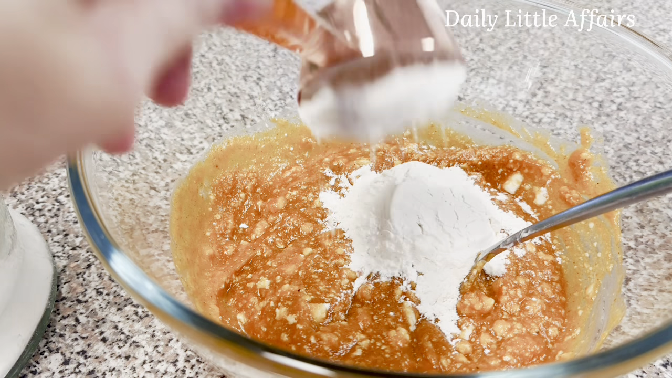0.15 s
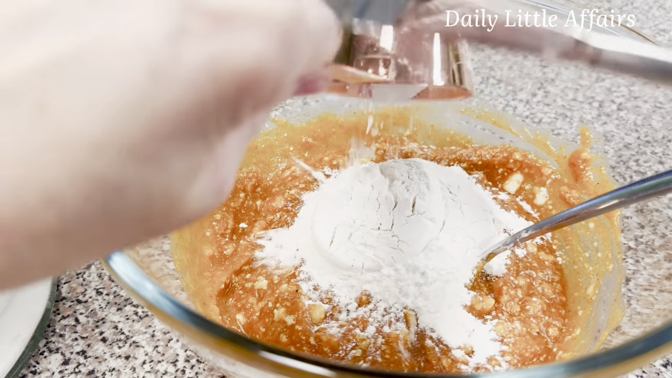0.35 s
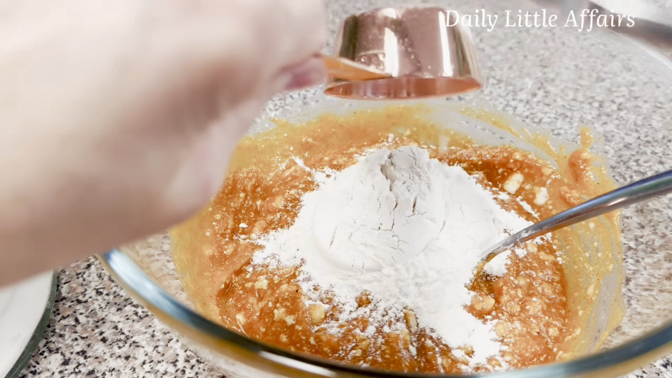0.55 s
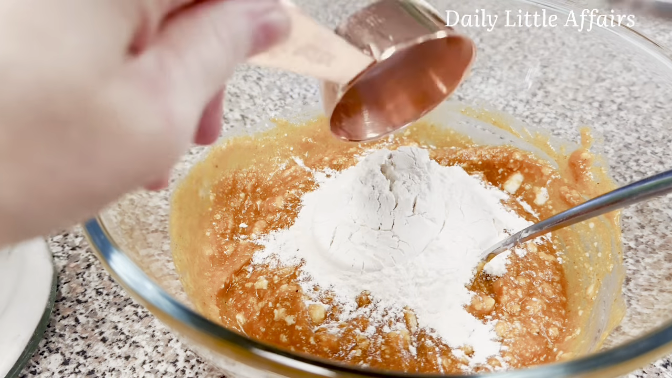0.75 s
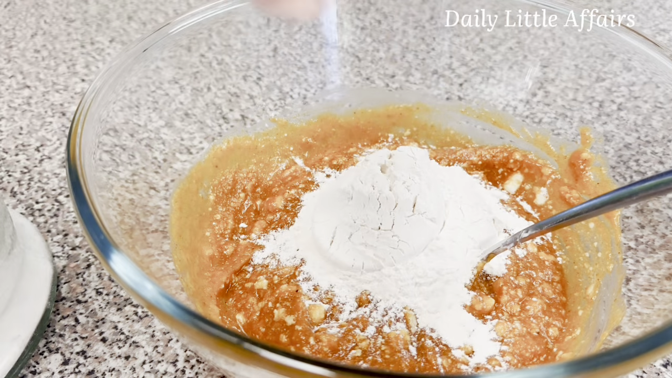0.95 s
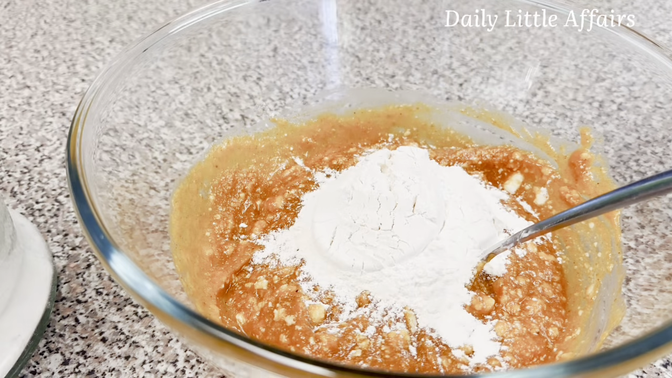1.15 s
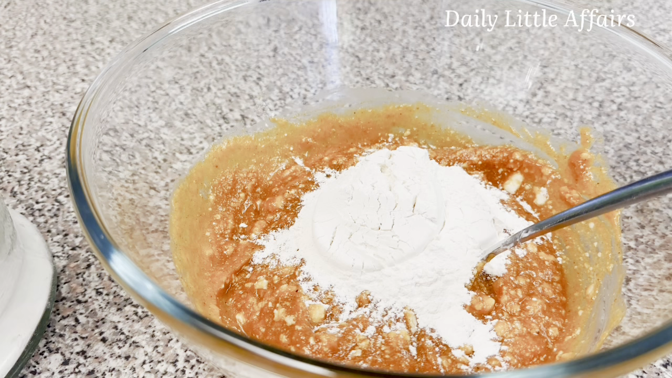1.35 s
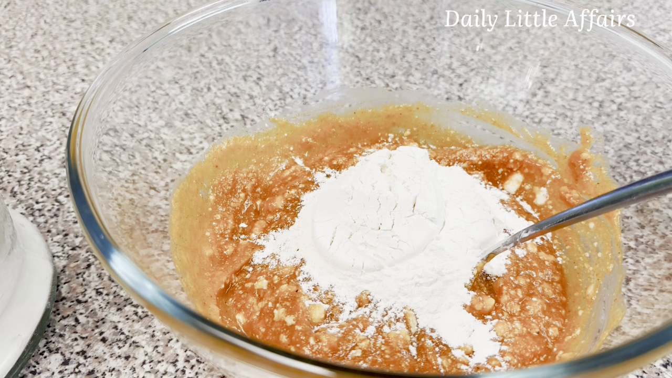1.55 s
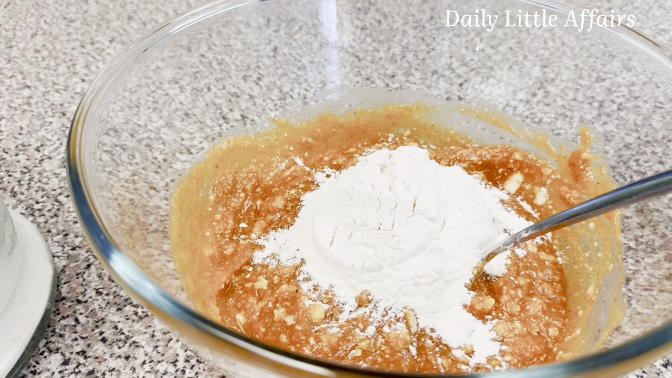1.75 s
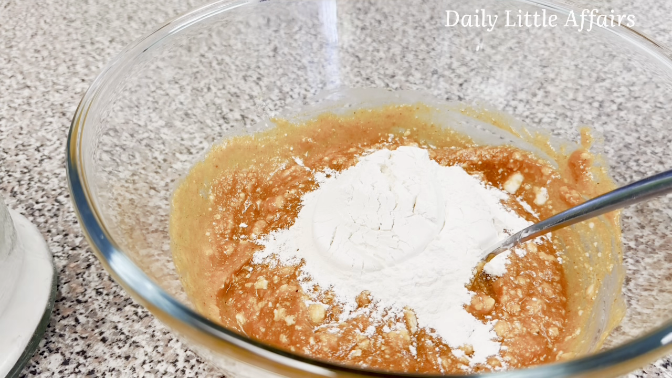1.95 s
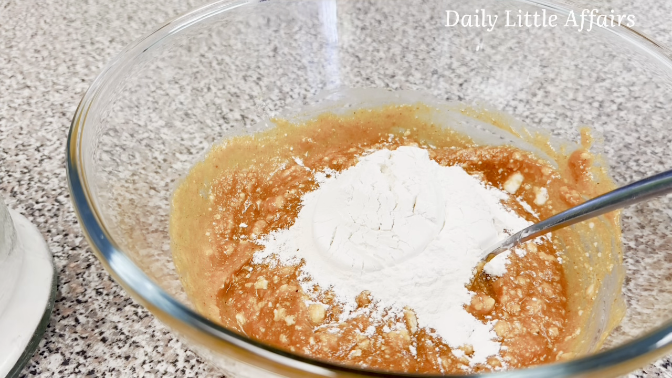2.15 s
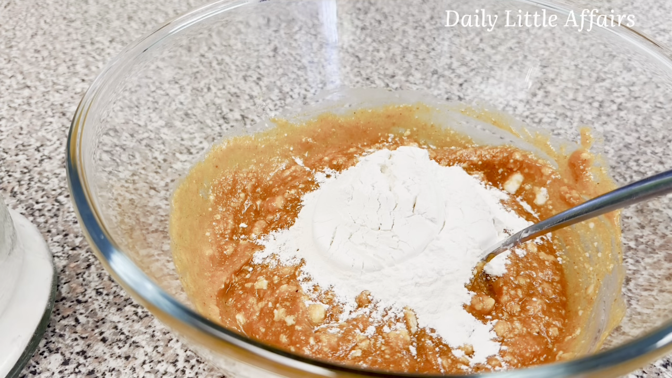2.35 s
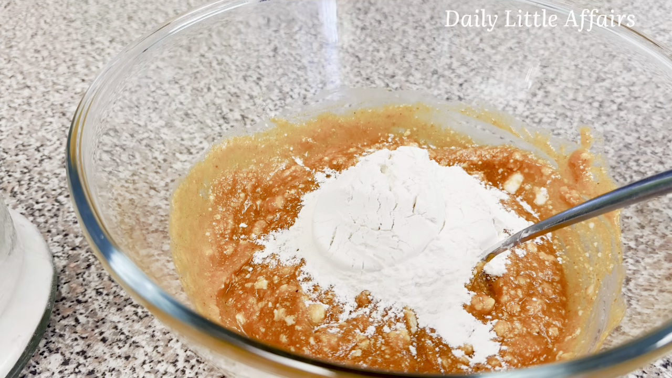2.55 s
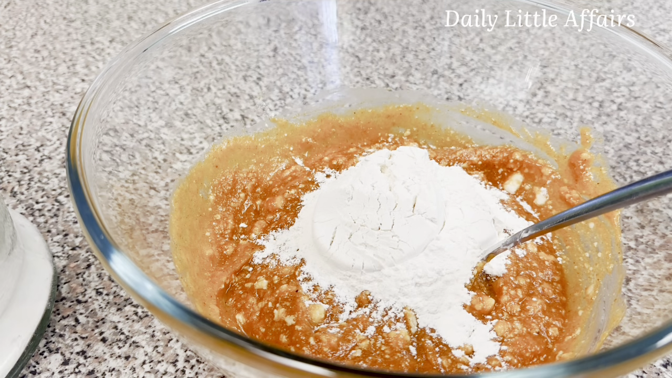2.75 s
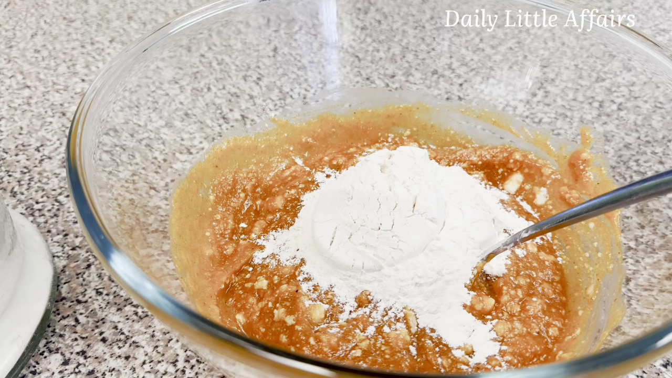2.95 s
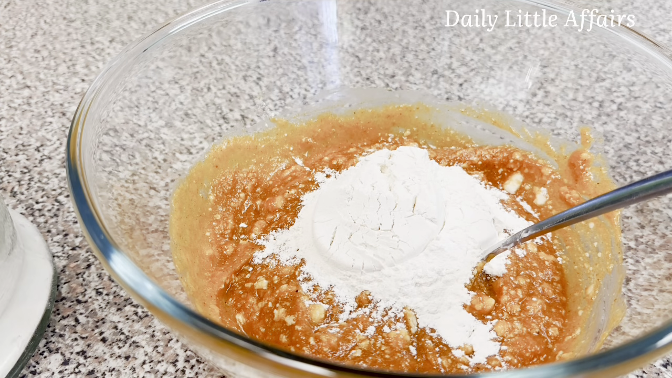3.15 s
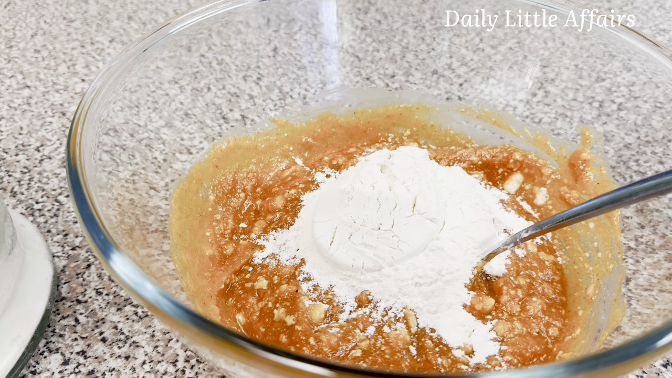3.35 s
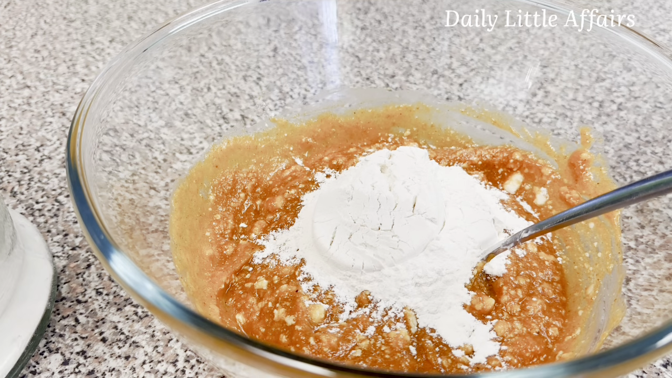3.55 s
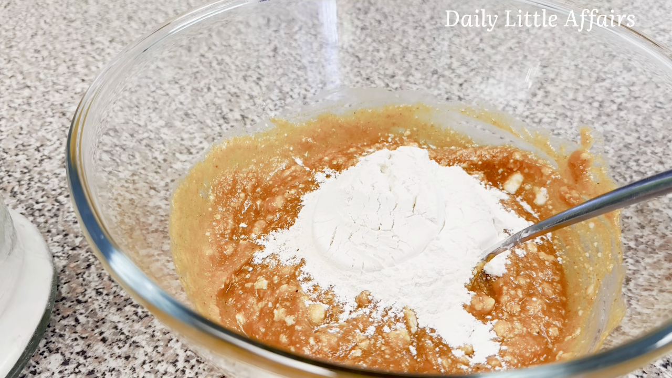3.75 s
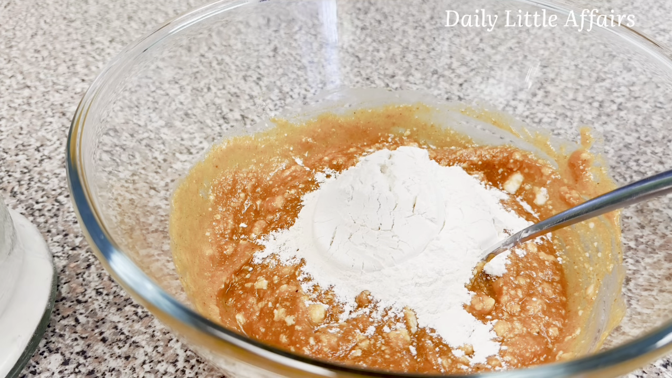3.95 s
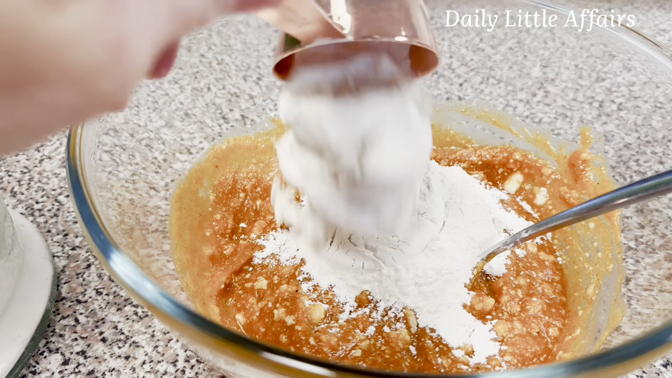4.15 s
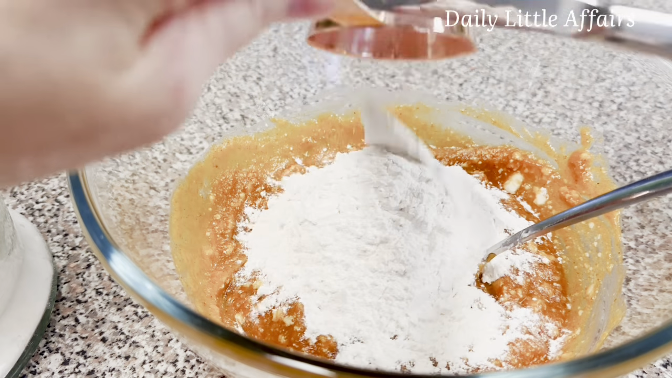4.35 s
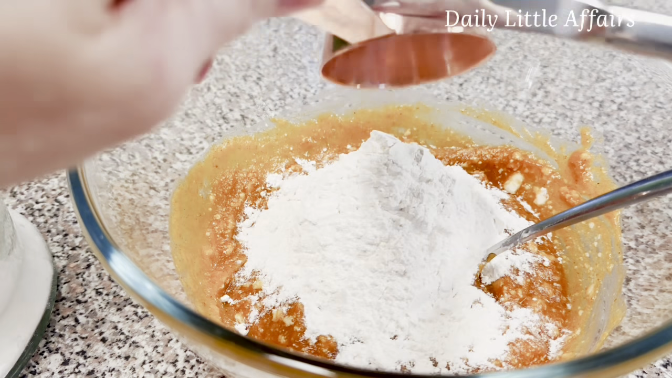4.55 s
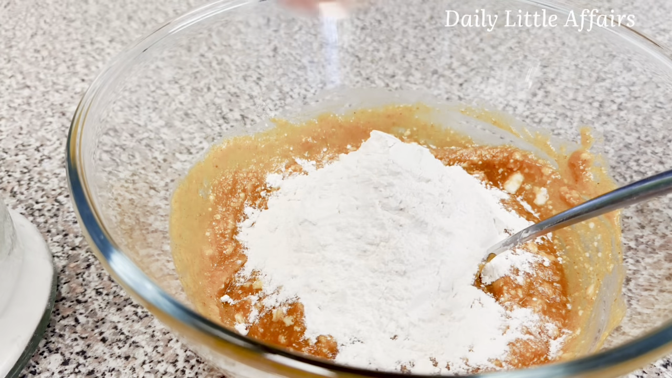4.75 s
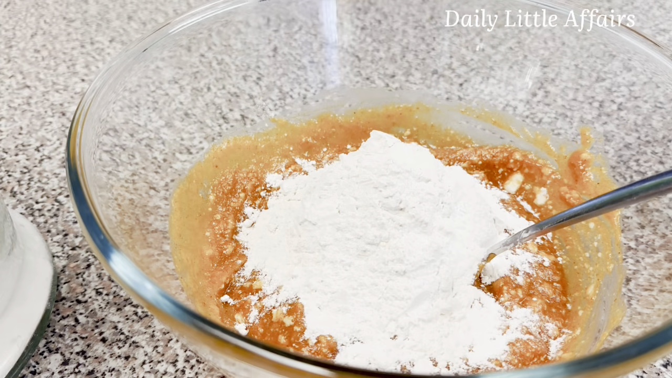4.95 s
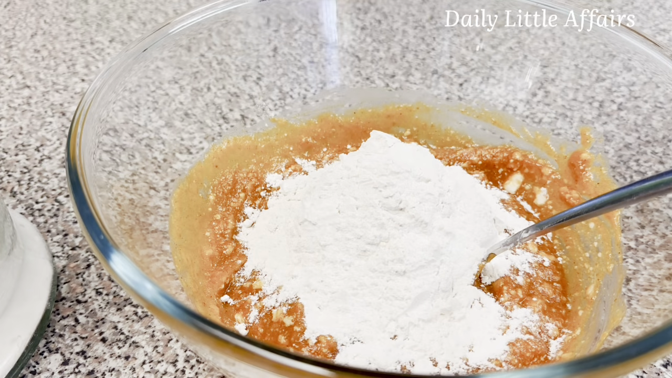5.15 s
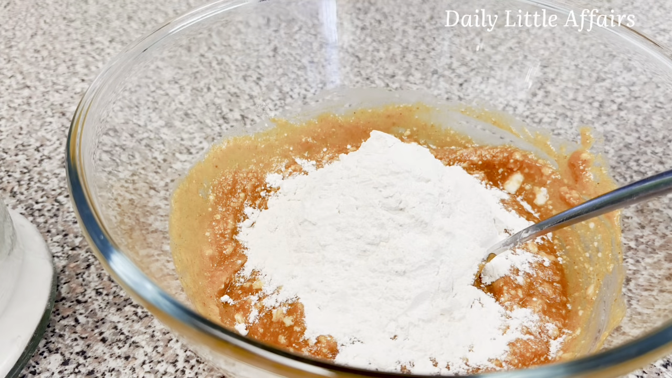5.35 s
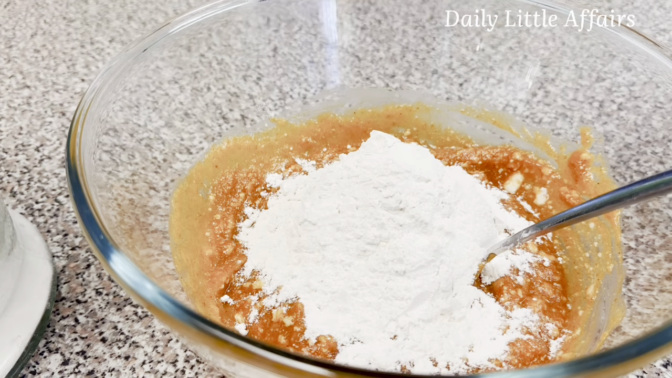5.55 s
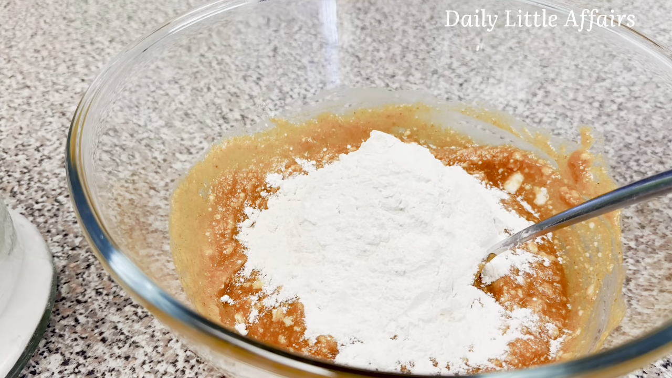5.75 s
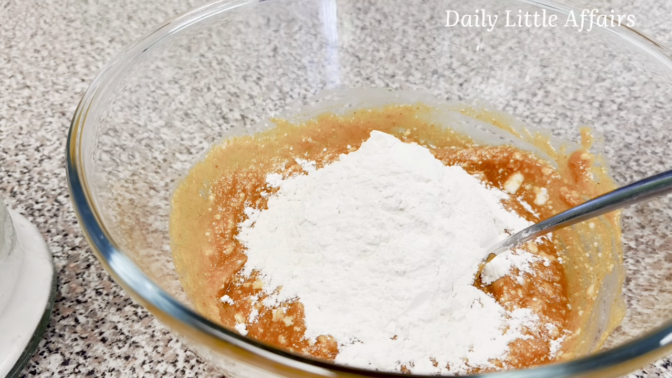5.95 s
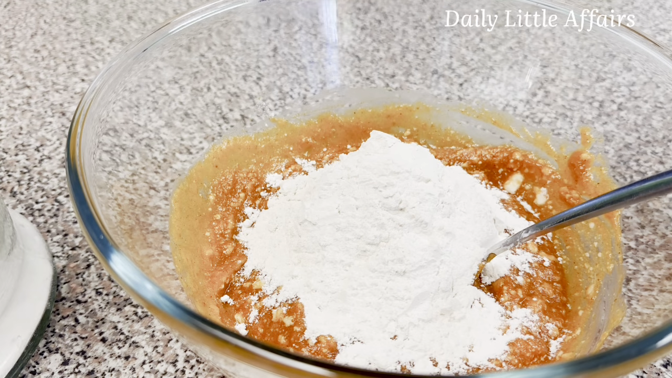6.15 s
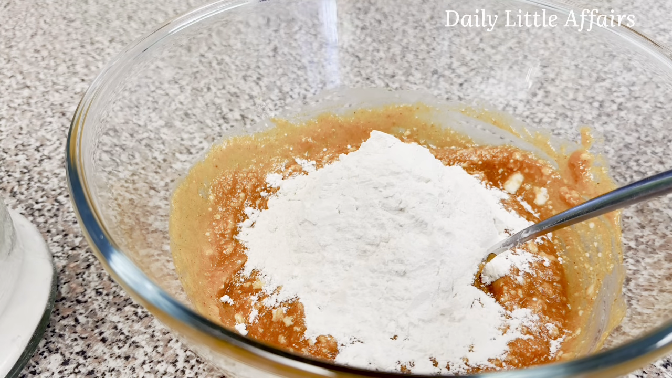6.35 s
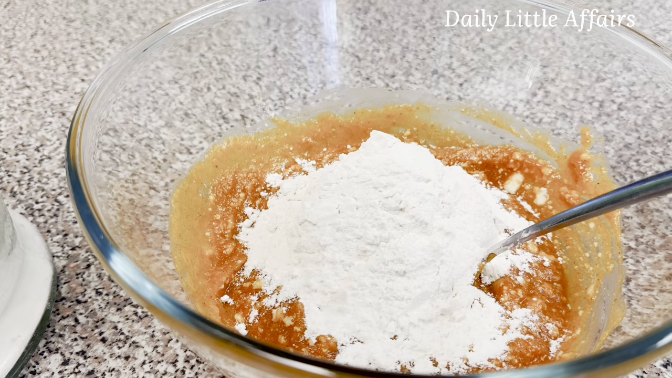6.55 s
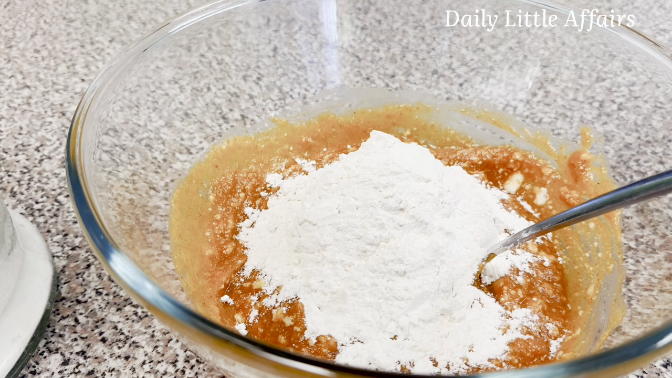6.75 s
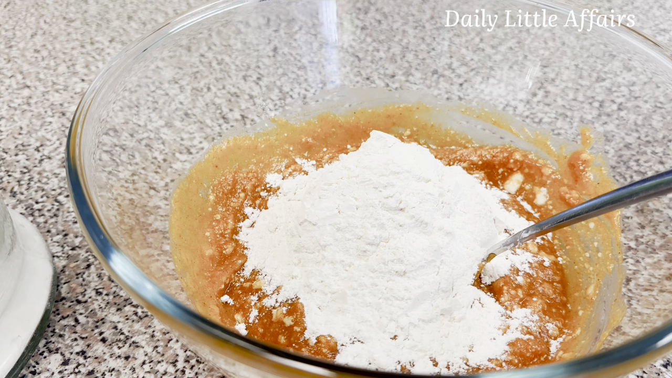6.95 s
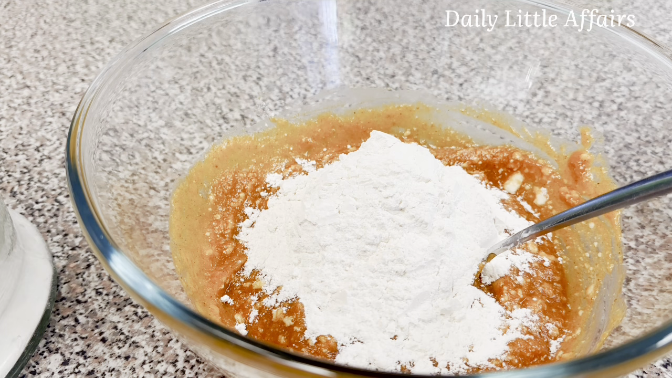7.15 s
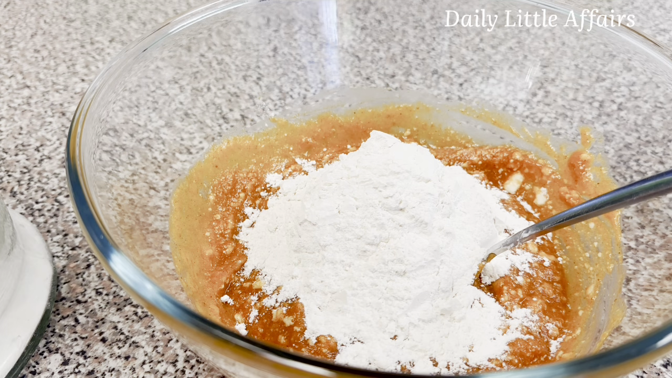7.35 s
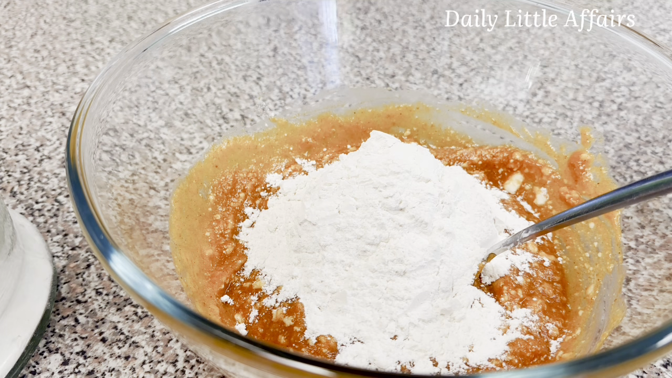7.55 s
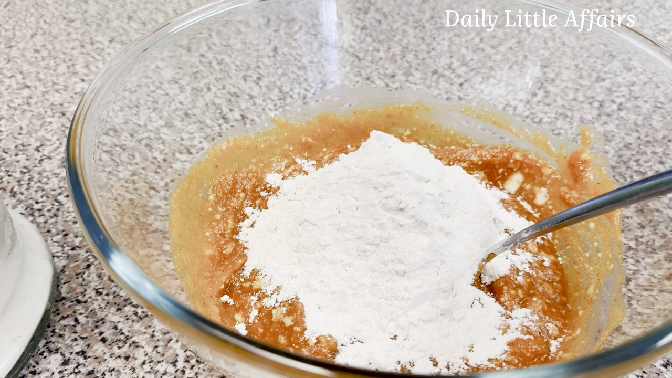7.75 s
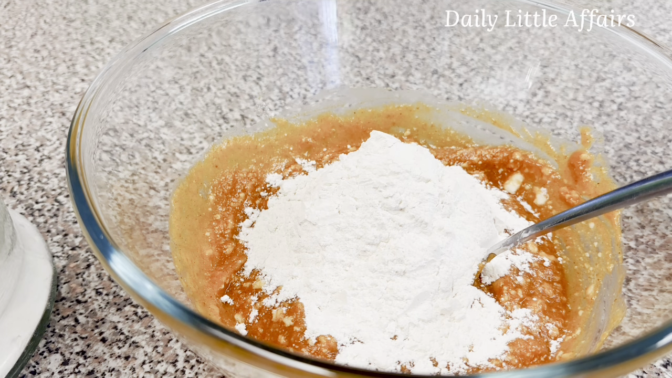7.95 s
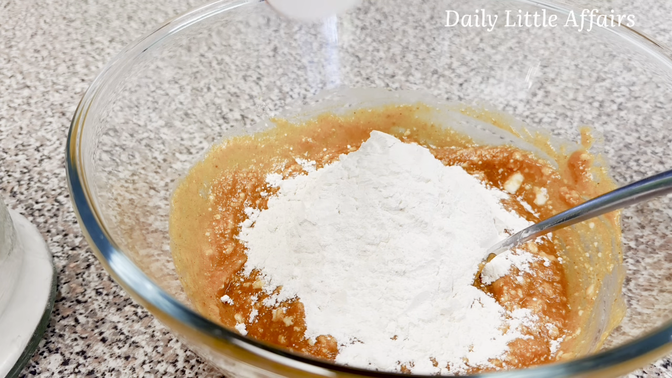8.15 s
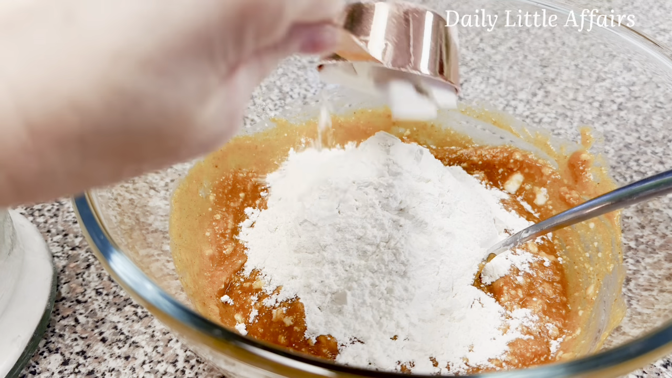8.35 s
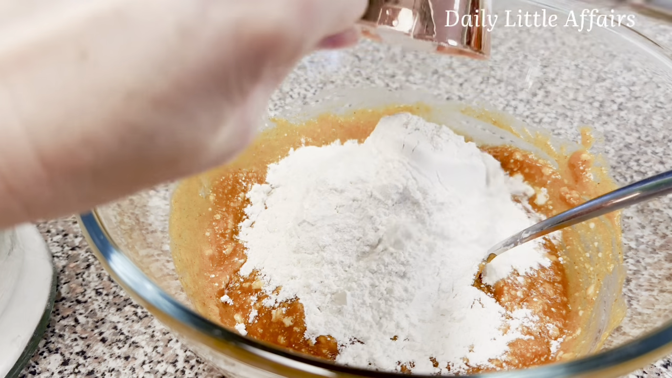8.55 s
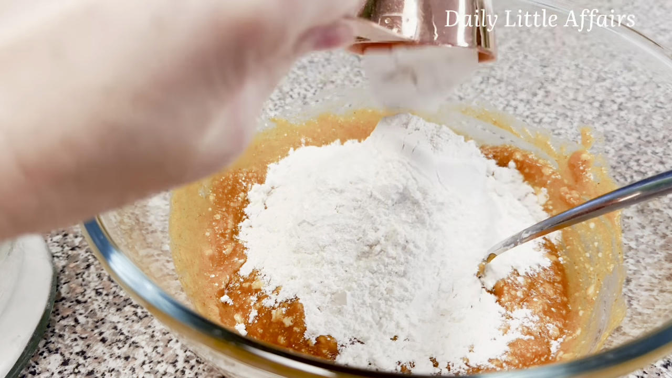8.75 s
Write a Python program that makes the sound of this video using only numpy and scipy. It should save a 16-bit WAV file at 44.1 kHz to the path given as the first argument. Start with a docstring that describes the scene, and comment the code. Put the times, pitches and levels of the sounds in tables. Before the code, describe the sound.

A knife taps flour out of a metal measuring cup into a bowl, with faint scooping and scraping in a quiet kitchen.

```python
"""Sharp knife taps on an upturned metal measuring cup, emptying its flour into a bowl: crack, rebound,
blade and rim ringing on. Between tap groups the cup digs into a flour jar; on the left the knife
knocks it and scrapes it level, stick-slip on the rim plus the hiss of sheared flour. Faint sleeve
rustle, ticks, a clink, counter bumps. Quiet, hard kitchen with fridge hum; two spaced microphones."""
import sys
import numpy as np
from scipy import signal
from scipy.fft import rfft, irfft
from scipy.io import wavfile
from scipy.ndimage import uniform_filter1d

SR = 44100
rng = np.random.default_rng(int(sys.argv[2]) if len(sys.argv) > 2 else 0)


def output_pcm(signal):
    """Save a mono or channel-first signal as 16-bit PCM at the path in sys.argv[1].

    Samples are clipped to [-1, 1] before scaling.
    """
    pcm = np.clip(np.atleast_2d(signal).T, -1, 1) * 32767
    wavfile.write(sys.argv[1], SR, np.round(pcm).astype(np.int16))


N = 388080

# knife on cup: t/s, blow/dB, clinging flour/dB, rim/dB, tilt/(dB/oct), free ring/dB, bending/dB,
# rebound delay/s, rebound/dB
KNIFE_TAPS = [(0.3318, -18.5, 10.5, 5.5, -0.5, -63.5, -10, 0.029, -29),
              (0.5016, -11.5, 1.5, 0, -0.7, -30, -13, 0.016, -8.5),
              (0.692, -13, -8, 6, 1, -28, -7, 0.015, 0.5),
              (4.2137, -15, 2.5, -0.5, -1, -61, 4, 0.017, -17.5),
              (4.3811, -20, 1.5, 1, 2.5, -54, 9, .012, 1),
              (4.5788, -21, 1.5, 2, 2.2, -50.5, 13.5, 0.013, 1.5),
              (8.645, -17, 8.5, -16, 5, -70, -5, 0.017, -6.5)]
# centres of the flour-laden, bottom, rim, wall and edge modes: f/Hz
CUP_REGIONS_HZ = [700, 1600, 3600, 7000, 13000]
# modes: f/Hz, level/dB, nominal t60/s, left-right/dB
EMPTY_CUP_MODES = [(447, -12.5, 0.024, 0.5), (626, -10.5, 0.025, 2), (715.2, -3, 0.027, 0),
                   (1553, -11, 0.04, 1.5), (1762, -6.5, 0.068, 3.5), (2281, -14.5, 0.12, 0.5),
                   (3618, -3, 0.084, 2), (5500, -2.5, 0.012, 7), (6840, 8, 0.0055, -1.5),
                   (8850, -10, 0.04, -8.5), (12955, -7.5, 0.057, 0.5), (14000, 0, 0.0056, -2.5)]
FREE_METAL_MODES = [(1006, 0, .42, 0), (2438, -5, 1., -4), (3661, 1, .5, 0), (4327, -1, .45, -2),
                    (5098, -11, .35, -3)]  # blade and cup rim ringing on after the rebound
JAR_MODES = [(108, -10, 0.097, -1.5), (193.3, -9.5, .08, 3), (277, -14, 0.1, 4.5), (351, 0.5, 0.045, -1.5),
             (1016, -9.5, 0.04, -3.5), (1720, -23, 0.034, 8), (2230, 0.5, 0.02, -9.5), (2892, -7, .03, 4.5),
             ]  # jar and shelf
FULL_CUP_MODES = [(192, 1.5, 0.086, 0), (328.3, 11, 0.049, 1.5), (971, -3.5, 0.049, 14.5),
                  (1063, -1.5, 0.033, -0.5), (2127, -3, 0.066, 7), (2953, 1.5, 0.034, 9.5),
                  (4425, -14.5, 0.073, 24), (5097, 2, 0.037, 8), (5960, -3, 0.049, 12.5),
                  (6470, -4.5, 0.081, 10.5), (13300, -19, 0.048, -14)]  # first two rows: thud
CLINK_MODES = [(3205, -4.5, 0.14, 0.005), (4323, -7, 0.079, 0)]
# bending per free metal mode: weight/1
BENDING_WEIGHTS = [1.3, -0.19, 1.5, .8, -0.75]
# contacts: t/s, level/dB
JAR_STRIKES = [(1.68, -11.5)]
RIM_SNAGS = [(2.784, -55), (3.288, -31.5), (3.335, -39), (3.355, -32), (3.385, -39.5), (7.268, -40),
             (7.306, -49), (7.389, -43), (7.478, -41), (7.579, -63)]
METAL_CLINKS = [(8.513, -56.5)]
# knife on heaped cup: t/s, thud/dB, ring/dB
CUP_KNOCKS = [(2.677, -43, -40.5), (3.185, -37, -36), (3.207, -34, -36.5), (5.307, -44.5, -63),
              (6.6, -50, -65), (6.662, -62, -62.5), (7.133, -34.5, -47), (7.24, -45.5, -50),
              (7.692, -42, -68.5), (7.727, -46, -70)]
# blade over rim: start/s, release/s, level/dB
RIM_SCRAPES = [(2.73, 2.79, -52.5), (3.22, 3.47, -42), (7.24, 7.59, -46)]
# hand and sleeve: t/s, length/s, level/dB
SLEEVE_MOVES = [(1.95, 0.38, -74), (4.013, 0.038, -76), (5.278, 0.07, -73.5), (5.437, 0.061, -72.5),
                (6.196, 0.049, -75.5), (6.633, 0.049, -69.5)]
# small impacts: t/s, level/dB, f/Hz
DRY_TICKS = [(0.043, -49, 4530), (0.276, -37, 2220), (2.516, -62, 3010), (2.547, -65.5, 3010),
             (3.056, -40, 12000), (4.028, -53.5, 5520), (5.9376, -40.5, 13330), (8.487, -52, 7440)]
COUNTER_BUMPS = [(1.079, -46, 75), (1.72, -36, 65.3), (5.312, -38, 77.4), (5.652, -42, 75)]
# noise spectra: f/Hz, relative density/dB
FLOUR_SPECTRUM = [(290, -47), (500, -29), (855, -8), (1230, -12.5), (2980, -10.5), (5090, -15.5),
                  (12900, -28.5), (16000, -74)]
CLOTH_SPECTRUM = [(880, -42), (1500, -10), (4160, -19.5), (5330, -9), (7170, -26), (13300, -40),
                  (16000, -37)]
RUMBLE_SPECTRUM = [(24, -38), (40, -11), (167, -3), (382, -4.5), (630, -16.5), (751, -12), (1950, -34),
                   (6020, -48), (11300, -58), (14500, -54.5), (16000, -63)]
# rumble between microphones: f/Hz, correlation/1
RUMBLE_COHERENCE = [(60, 1), (380, 0.27), (2380, -0.32), (15000, -0.082)]
# fridge tones: f/Hz, rms level/dB
FRIDGE_TONES = [(59.2, -65), (96.9, -69.5), (193.8, -61.5), (393.0, -66)]
# room decay: f/Hz, t60/s
ROOM_T60 = [(200, 0.98), (530, 0.3), (1390, 0.71), (3680, 0.61), (9700, 0.49)]
# microphone pair, mid and side response: f/Hz, gain/dB
MID_RESPONSE = [(9800, 0.5), (10600, -8), (12000, -13), (12600, -2.5)]
SIDE_RESPONSE = [(12000, 1.5), (12800, -7)]

CRACK_T60_S, CUSHION_DB_PER_DB = 0.00886, 0.71  # base decay; clinging flour lengthens it
REBOUND_DAMPING = 2.8  # a springing blade lingers and damps the cup
JOLT_DB, JOLT_DB_PER_DB = -12, 0.54  # more rebound, more jolt
GRIP_S = 0.99  # grip has stilled the ring by then
FLAT_RING_DB, TILT_PER_OCT = -34, 0.32  # harder knocks are brighter
SLIPS_PER_S, SMOOTH_HISS_GAIN = 1500, 1.3
PRESS_DAMPING, ROAM_SHARE = 1.6, 0.016  # pressing blade damps and detunes the cup
OVERLOAD_FS, BAND_LIMIT_HZ = 0.9, 16500


def knife_taps():
    """Crack, damped cup modes, counter jolt; blade and cup rim ring on after the rebound."""
    rings, cracks, close = np.zeros((3, 2, N))
    mode_hz = np.transpose(EMPTY_CUP_MODES)[0]
    grip = np.cos(np.pi / 2 * np.minimum(np.arange(SR) / SR / GRIP_S, 1) ** 4)
    for s, blow_db, flour_db, rim_db, tilt_db_oct, free_db, bend_db, delay_s, rebound_db in KNIFE_TAPS:
        region_db = blow_db + tilt_db_oct * np.log2(np.divide(CUP_REGIONS_HZ, CUP_REGIONS_HZ[2]))
        region_db[[0, 2]] = blow_db + flour_db, blow_db + rim_db
        colour = np.transpose([CUP_REGIONS_HZ, region_db])
        mode_db = at_hz(colour, mode_hz)
        crack_colour = [(400, region_db[1] - 9.5), *colour[[1, 3, 4]]]  # small cup: little bass
        damping = 1 + REBOUND_DAMPING * gain(rebound_db)
        add(rings, s, gain(-1) * ring(EMPTY_CUP_MODES, mode_db, damping))
        add(cracks, s, gain(10) * crack(crack_colour, CRACK_T60_S * gain(CUSHION_DB_PER_DB * flour_db)))
        skid = rng.standard_normal((1, 300)) * np.hanning(300) / 10
        rebound = signal.oaconvolve(ring(EMPTY_CUP_MODES, mode_db), skid, axes=1)
        add(rings, s + delay_s, gain(rebound_db - 4.5) * rebound)
        add(cracks, s + delay_s, gain(rebound_db - 2) * crack(crack_colour, t60_s=0.12))
        for mode, weight in zip(FREE_METAL_MODES, BENDING_WEIGHTS):
            turning_db = 3.5 * wander(1500, samples=SR)  # metal turns in the hand
            free_ring = ring([mode], bend_db * weight, samples=SR)
            add(close, s + delay_s, gain(free_db + turning_db) * grip * free_ring)
        jolt_db = blow_db + JOLT_DB + JOLT_DB_PER_DB * rebound_db
        add(close, s, gain(jolt_db) * bump(hz=75, t60_s=0.1))
    return delay_left(rings, samples=3) + delay_left(cracks, samples=6), close


def jar_plunge():
    """The digging cup strikes the jar; jar and shelf ring."""
    out = np.zeros((2, N))
    colour = [(300, 5.5), (2500, 9), (8000, -11.5), (16000, -30)]
    for s, blow_db in JAR_STRIKES:
        add(out, s, gain(blow_db) * (ring(JAR_MODES) + crack(colour, t60_s=0.035)))
    return delay_left(out, samples=13)


def cup_knocks():
    """Knife on the heaped cup: dull thud, metal ring, crack."""
    out, hz = np.zeros((2, N)), np.transpose(FULL_CUP_MODES)[0]
    for s, thud_db, ring_db in CUP_KNOCKS:
        tilt_db_oct = TILT_PER_OCT * (ring_db - FLAT_RING_DB)
        mode_db = np.where(hz < 600, thud_db, ring_db + tilt_db_oct * np.log2(hz / 3000))
        add(out, s, ring(FULL_CUP_MODES, mode_db))
        colour = [(500, -6.5), (2800, 6.5), (16000, 5.1 * tilt_db_oct + 6.5)]
        add(out, s, gain(ring_db) * gain([[11.5], [4.5]]) * crack(colour, t60_s=0.066))
    return delay_left(out, samples=-15)


def rim_scrape():
    """Uneven slips and snags ring the full cup; sheared flour hisses."""
    slip_db = 6.5 * np.minimum(rng.exponential(1, N), 3)
    slips = gain(slip_db) * (rng.random(N) < SLIPS_PER_S / SR) * rng.choice([-1, 1], N)
    snag_rows = [(s, s, db) for s, db in RIM_SNAGS]
    snags = envelope(snag_rows, attack_s=0.002, ease_db_s=0, release_db_s=60 / 0.031)
    strokes = envelope(RIM_SCRAPES, attack_s=0.023, ease_db_s=35.5, release_db_s=320)
    push = strokes * gain(2.2 * wander(350)) + snags
    body = sum(rubbed_mode(unit_rms(slips) * push, *mode) for mode in FULL_CUP_MODES[2:])
    shear = slips + SMOOTH_HISS_GAIN * rng.standard_normal((2, N))
    hiss = coloured(shear, FLOUR_SPECTRUM) * gain([[-4.5], [-9]])
    return delay_left(gain(-29.5) * body + hiss * push, samples=-15)


def rubbed_mode(force, hz, db, t60_s, side_db):
    """Driven mode; pitch and strength roam with the contact point."""
    phasor = np.exp(2j * np.pi * np.cumsum(hz * (1 + ROAM_SHARE * wander(2500))) / SR)
    drive = force * gain(db + 3.5 * wander(2500)) / phasor + 1e-18
    pole = gain(-60 * PRESS_DAMPING / t60_s / SR)
    wave = (phasor * signal.lfilter([1], [1, -pole], drive)).real
    return wave * gain([[side_db / 2], [-side_db / 2]])


def sleeve_rustle():
    """Grainy cloth noise in short gestures."""
    grains = rng.standard_normal((2, N)) * gain(2 * flutter(150))
    moves = [(s, s + length_s, db) for s, length_s, db in SLEEVE_MOVES]
    motion = envelope(moves, attack_s=0.0062, ease_db_s=2.5, release_db_s=247.5)
    return coloured(grains, CLOTH_SPECTRUM) * motion


def ticks_and_clink():
    """Faint dry contacts and a light metal ring."""
    out = np.zeros((2, N))
    for s, db, hz in DRY_TICKS:
        add(out, s, gain(db) * crack([(hz / 4, -24), (hz, 0), (hz * 3, -34)], t60_s=0.02))
    for s, db in METAL_CLINKS:
        add(out, s, gain(db) * ring(CLINK_MODES))
    return out


def counter_bumps():
    """Soft thumps carried by the counter."""
    out = np.zeros((2, N))
    for s, db, hz in COUNTER_BUMPS:
        add(out, s, gain(db) * bump(hz, t60_s=0.3))
    return out


def kitchen_reverb(x, gap_s=0.006):
    """Sparse random-sign reflections; each band decays at its own rate."""
    echoes = np.zeros((2, SR))
    arrivals = np.arange(0, SR - 20, 20) + rng.integers(0, 20, (2, (SR - 1) // 20))
    np.put_along_axis(echoes, arrivals, rng.choice([-1., 1.], arrivals.shape), 1)
    hz, t, bands = signal.stft(echoes, SR, nperseg=256)
    decay_db = -60 * t / at_hz(ROOM_T60, hz)[:, None]
    colour_db = at_hz([(120, -13.5), (400, -0.5), (15000, -9)], hz)[:, None]
    tail = signal.istft(bands * gain(decay_db + colour_db), SR, nperseg=256)[1]
    tail = np.pad(tail / np.linalg.norm(tail[0]), ((0, 0), (round(gap_s * SR), 0)))
    return signal.fftconvolve(x, tail, axes=1)[:, :N]


def room_rumble(rms_db=-53.5):
    """Low noise in drifting patches, partly coherent between the microphones."""
    frames, hz = N // 512 + 5, np.fft.rfftfreq(2048, 1 / SR)
    left_re, left_im, other_re, other_im, patches = rng.standard_normal((frames, 1025, 5)).T
    patches = unit_rms(uniform_filter1d(uniform_filter1d(patches, 10, axis=0), 6, axis=1))
    coherence = np.clip(at_hz(RUMBLE_COHERENCE, hz), -1, 1)[:, None]
    left = left_re + 1j * left_im
    right = coherence * left + np.sqrt(1 - coherence ** 2) * (other_re + 1j * other_im)
    bands = np.array([left, right]) * gain(at_hz(RUMBLE_SPECTRUM, hz)[:, None] + 2.2 * patches)
    return gain(rms_db) * unit_rms(signal.istft(bands, nperseg=2048, noverlap=1536)[1][:, :N])


def fridge_hum():
    """Low tones wavering in phase and level."""
    out, t = np.zeros(N), np.arange(N) / SR
    for hz, db in FRIDGE_TONES:
        drift_rad, waver_db = 0.25 * flutter(4000), 0.38 * flutter(4000)
        out += np.sqrt(2) * gain(db + waver_db) * np.sin(2 * np.pi * hz * t + drift_rad)
    return out


def ring(modes, extra_db=0., damping=0.93, samples=SR // 4):
    """Struck modes: panned decaying sines, strengths scattered per blow."""
    hz, db, t60_s, side_db = np.transpose(modes)[:, :, None]
    t = np.arange(samples) / SR
    db = db + np.reshape(extra_db, (-1, 1)) + 1.5 * rng.standard_normal(db.shape)
    waves = gain(db - 60 * damping * t / t60_s) * np.sin(2 * np.pi * hz * t)
    waves *= 1 - np.exp(-t * hz * 1.7)  # about one cycle to swell
    return np.array([(waves * gain(side * side_db / 2)).sum(0) for side in (1, -1)])


def crack(colour, t60_s):
    """Contact burst: dense brief modes as decaying noise; minimum phase keeps the attack sharp."""
    burst = np.zeros(SR // 4)
    burst[:2000] = np.tanh(rng.standard_normal(2000)) * gain(-60 * np.arange(2000) / SR / t60_s)
    magnitude = gain(np.maximum(at_hz(colour, np.fft.rfftfreq(1024, 1 / SR)), -80))
    log_magnitude = np.log(np.r_[magnitude, magnitude[-2:0:-1]])
    impulse = np.fft.ifft(np.exp(log_magnitude - 1j * signal.hilbert(log_magnitude).imag)).real
    return np.tile(signal.oaconvolve(burst, impulse)[:len(burst)], (2, 1))


def bump(hz, t60_s):
    """Low push: swells for a cycle, then decays."""
    t = np.arange(SR // 3) / SR
    swell = 1 - np.exp(-t * hz * 1.1)
    return np.tile(np.sin(2 * np.pi * hz * t) * swell * gain(-60 * t / t60_s), (2, 1))


def envelope(rows, attack_s, ease_db_s, release_db_s):
    """Gestures (start/s, end/s, level/dB): rise, ease off while held, die away."""
    t, out = np.arange(N) / SR, np.zeros(N)
    for start_s, end_s, db in rows:
        attack = np.clip((t - start_s) / attack_s, 0, 1)
        held_s, released_s = np.clip(t - start_s, 0, end_s - start_s), np.maximum(t - end_s, 0)
        out += attack * gain(db - ease_db_s * held_s - release_db_s * released_s)
    return out


def flutter(width):
    """Noise averaged over width samples, rms 1."""
    return unit_rms(uniform_filter1d(rng.standard_normal(N), width))


def wander(width, samples=N):
    """Noise averaged twice over width samples, rms 1."""
    return unit_rms(uniform_filter1d(uniform_filter1d(rng.standard_normal(samples), width), width))


def coloured(x, spectrum):
    """Shapes x by a spectrum, rms 1."""
    return unit_rms(irfft(rfft(x) * gain(at_hz(spectrum, np.fft.rfftfreq(N, 1 / SR))), N))


def at_hz(points, hz):
    """Interpolates on a log frequency axis."""
    point_hz, values = np.transpose(points)
    return np.interp(np.log(hz + 1), np.log(point_hz + 1), values)


def gain(db):
    return 10 ** (np.asarray(db) / 20)


def unit_rms(x):
    return x / np.sqrt(np.mean(x ** 2) + 1e-20)


def delay_left(x, samples):
    return np.array([np.roll(x[0], samples), x[1]])


def add(mix, s, sound):
    part = mix[:, round(s * SR):][:, :sound.shape[1]]
    part += sound[:, :part.shape[1]]


def scene():
    """Near sources, their reverb, background."""
    cup, ring_and_jolt = knife_taps()
    handling = sleeve_rustle() + counter_bumps()
    ticks = ticks_and_clink()
    filling = jar_plunge() + cup_knocks() + rim_scrape()
    direct = cup + ring_and_jolt + filling + ticks + handling
    send = gain(-5) * (cup + ticks) + gain(-13.5) * ring_and_jolt + gain(-9.5) * filling
    return direct + kitchen_reverb(send) + room_rumble() + fridge_hum()


def record(dry):
    """Microphone pair's treble response, 48 Hz high-pass, soft overload, band limit."""
    hz = np.linspace(0, SR / 2, 257)
    mid_fir = signal.firwin2(301, hz, gain(at_hz(MID_RESPONSE, hz)), fs=SR)
    side_fir = signal.firwin2(301, hz, gain(at_hz(SIDE_RESPONSE, hz)), fs=SR)
    mid = signal.oaconvolve((dry[0] + dry[1]) / 2, mid_fir, "same")
    side = signal.oaconvolve((dry[0] - dry[1]) / 2, side_fir, "same")
    highpassed = signal.lfilter(*signal.butter(3, 48, "high", fs=SR), [mid + side, mid - side])
    saturated = OVERLOAD_FS * np.tanh(highpassed / OVERLOAD_FS)
    lowpass = signal.firwin(255, BAND_LIMIT_HZ, window=("kaiser", 9), fs=SR)
    return signal.oaconvolve(saturated, lowpass[None], "same")


dry = scene()
out = record(dry)
output_pcm(out)
```